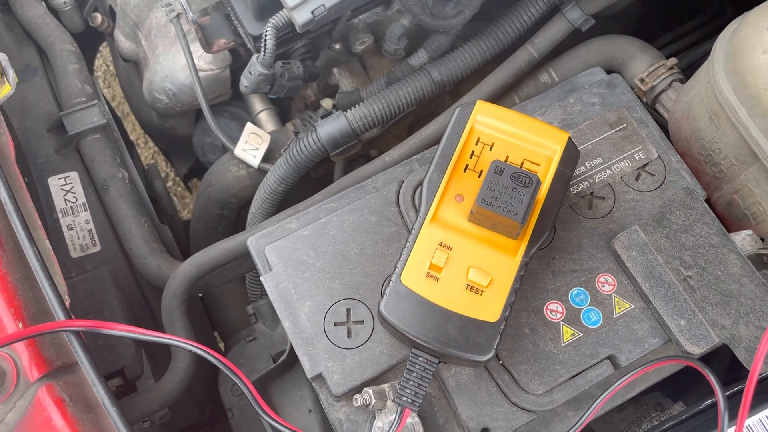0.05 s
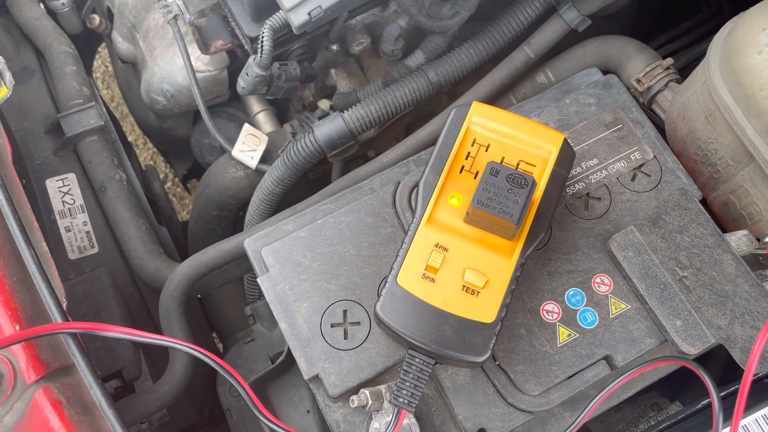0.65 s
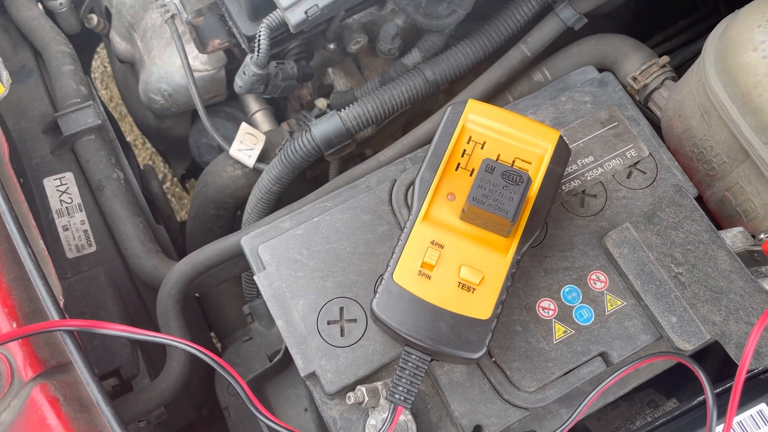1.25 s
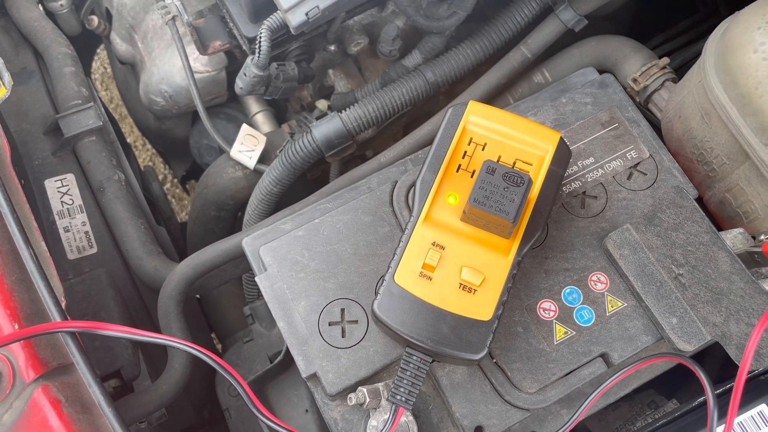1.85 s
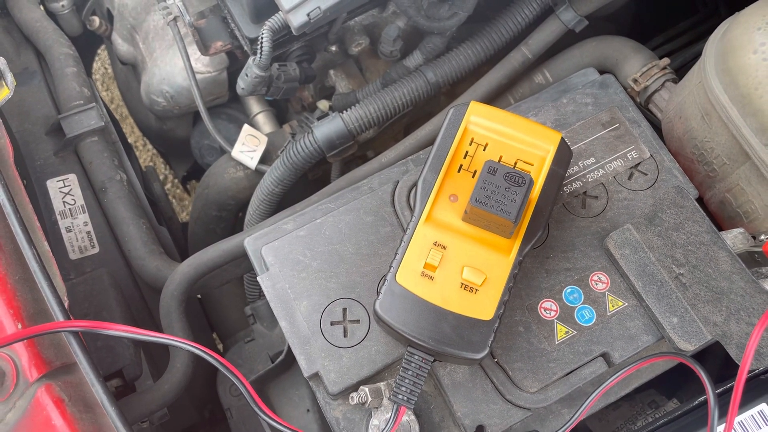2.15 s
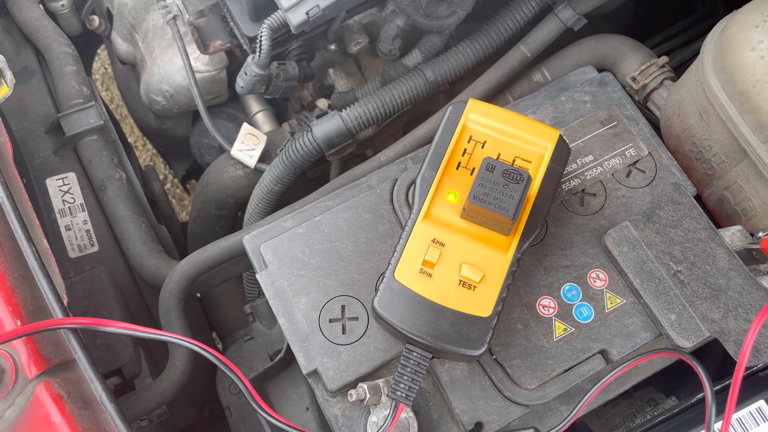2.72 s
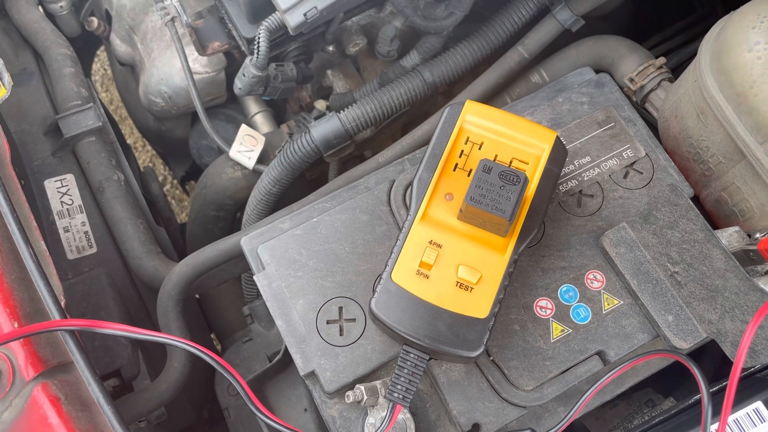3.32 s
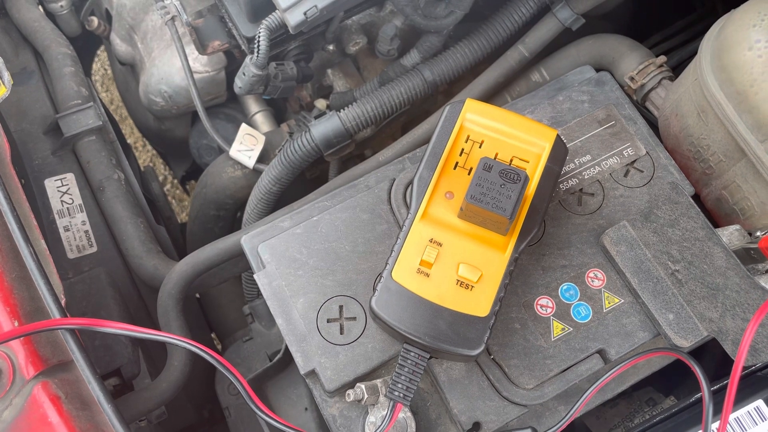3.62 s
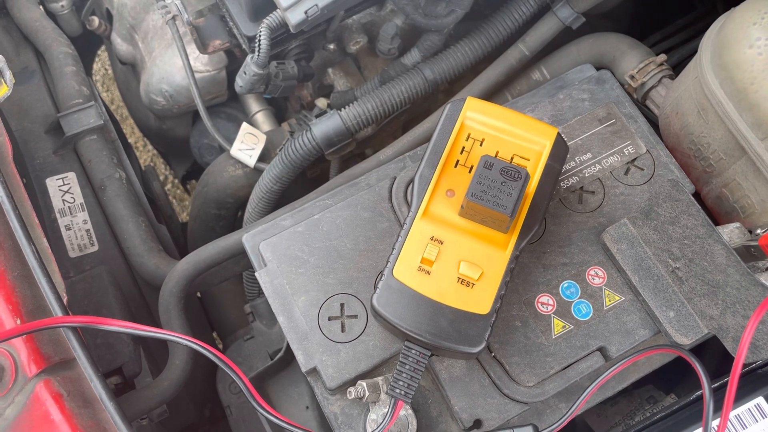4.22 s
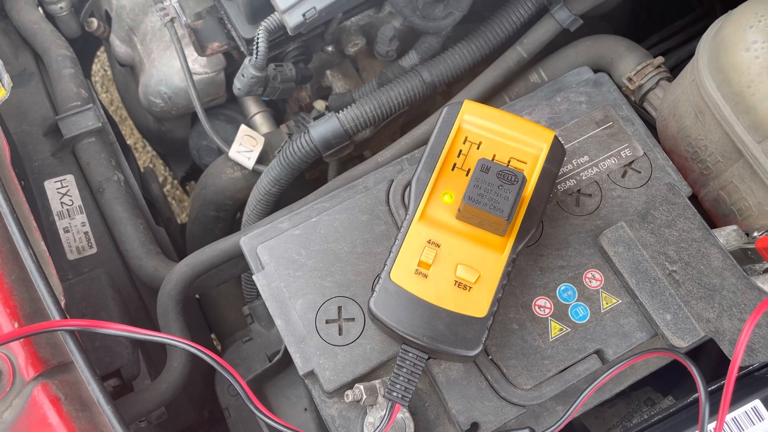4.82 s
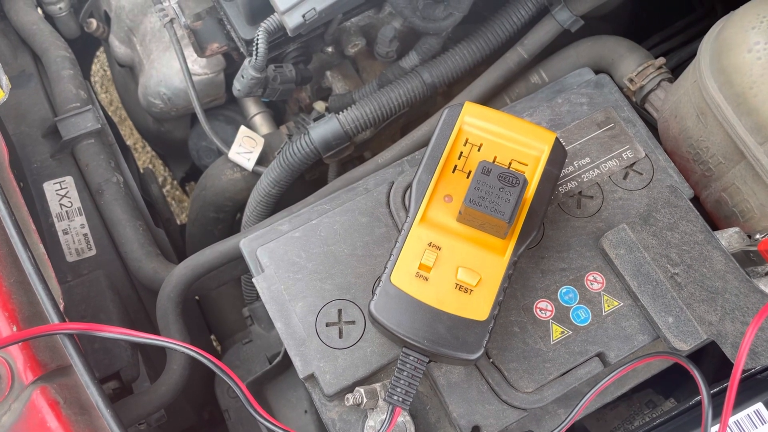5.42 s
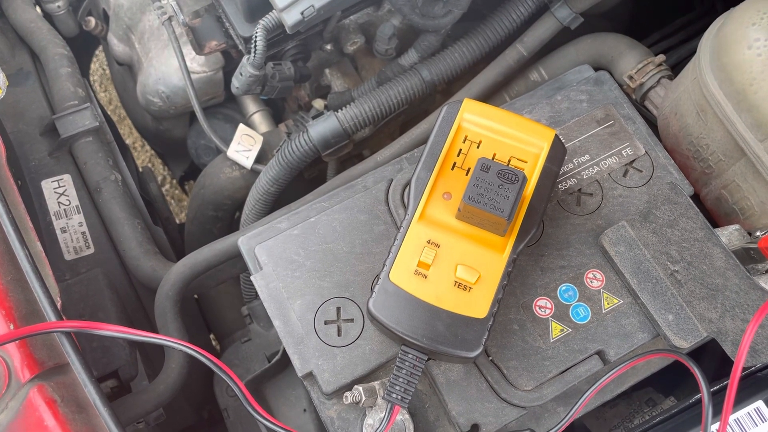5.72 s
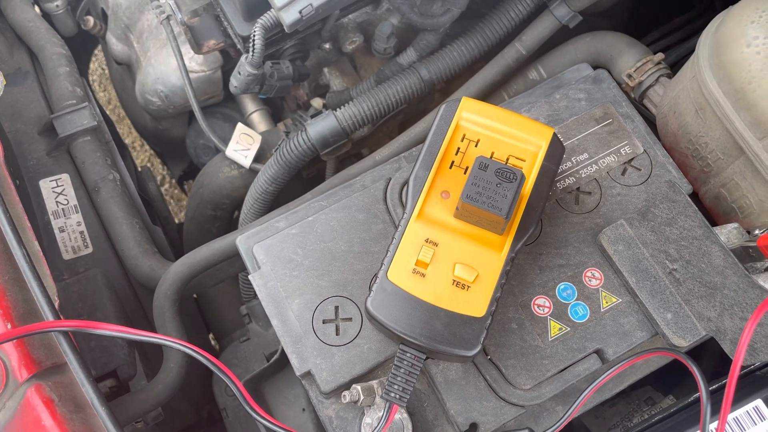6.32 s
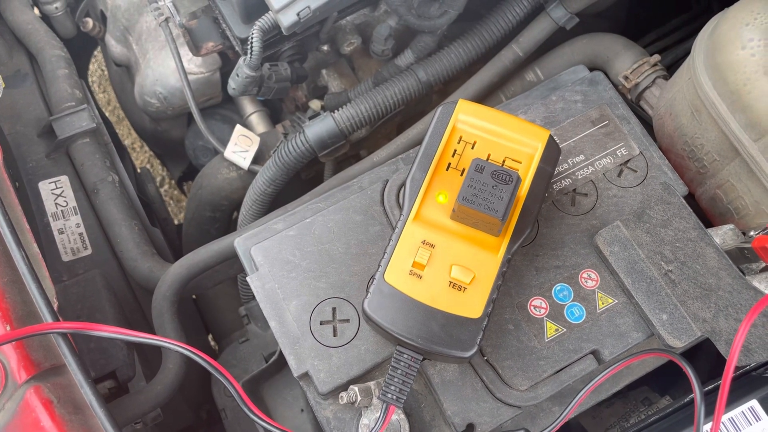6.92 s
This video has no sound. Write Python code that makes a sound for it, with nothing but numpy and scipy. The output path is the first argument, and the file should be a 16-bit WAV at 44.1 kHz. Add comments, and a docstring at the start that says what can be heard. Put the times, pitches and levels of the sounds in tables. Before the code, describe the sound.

A car relay clicks on and off evenly up close, over a low engine hum and the sound of an approaching car.

```python
"""A sharp, ringing tick close by, then a drier tock: a relay switches on and off about once a second.
It is driven by a tester lying on a car battery under an open bonnet. Each stroke of the armature
strikes and bounces, and these impacts excite the damped modes of the frame and plastic case.
Behind it an engine hums at its firing rate and road noise grows as the car draws nearer;
dull bumps and faint rustles come and go, and small birds call far off."""
import sys
import numpy as np
from scipy import signal
from scipy.fft import rfft, irfft
from scipy.io import wavfile
from scipy.ndimage import uniform_filter1d

SR = 44100
rng = np.random.default_rng(int(sys.argv[2]) if len(sys.argv) > 2 else 0)


def dump(signal):
    """Clip the signal to [-1, 1] and save it as 16-bit WAV at the path in sys.argv[1]."""
    limited = np.clip(np.atleast_2d(signal).T, -1, 1)
    pcm = np.round(limited * 32767).astype(np.int16)
    wavfile.write(sys.argv[1], SR, pcm)


N = 311346
RING = 16384  # samples allowed for one decay


def undb(db):
    """Amplitude ratio of a level in decibels."""
    return 10 ** (np.asarray(db) / 20)


def unit(x):
    """Normalisation to an rms of 1."""
    return x / np.sqrt(np.mean(x ** 2))


def decay(t60):
    """Exponential damping: a fall of 60 dB in t60 seconds."""
    return np.exp(-np.log(1000) * np.arange(RING) / SR / t60)


def curve(table):
    """Linear interpolation of (time [s], value) points at every sample."""
    return np.interp(np.arange(N) / SR, *np.transpose(table))


def colour(x, spectrum):
    """Spectral shaping by (frequency [Hz], gain [dB]) points, falling steeply above the last."""
    hz, db = np.transpose(spectrum)
    f = np.maximum(np.fft.rfftfreq(x.shape[-1], 1 / SR), 1)
    gain = undb(np.interp(np.log(f), np.log(hz), db))
    roll_off = np.minimum(hz[-1] / f, 1) ** 2
    return irfft(rfft(x) * gain * roll_off, x.shape[-1])


def lowpass(x, hz, order=2):
    """Maximally flat low-pass filtering."""
    return signal.sosfilt(signal.butter(order, hz, fs=SR, output="sos"), x)


def walk(rate_hz):
    """Slow random modulation: smoothed random steps with an rms of 1."""
    hold = int(SR / rate_hz)
    steps = np.repeat(rng.standard_normal(N // hold + 1), hold)
    return unit(uniform_filter1d(uniform_filter1d(steps, hold), hold)[:N])


# width of the outdoor sound: (frequency [Hz], side minus mid level [dB])
FIELD_WIDTH = [(60, -43), (150, -29.5), (300, -11), (600, -2), (1200, -7.5), (5000, -1)]

def diffuse(spectrum, size):
    """A diffuse field: noise from all around, coherent between the channels in the bass and increasingly so
    above 5 kHz."""
    mid, side = rng.standard_normal((2, size))
    side = colour(side, FIELD_WIDTH)
    return unit(colour(np.array([mid + side, mid - side]), spectrum))


def bird_note(length_s, start_hz, end_hz, waver=0.006, echo_db=-5, echo_decay_s=0.09):
    """Frequency modulation: an unsteady glide, blurred by echoes on its long path."""
    size = int(length_s * SR)
    jitter = unit(lowpass(rng.standard_normal(size), 200))
    hz = np.linspace(start_hz, end_hz, size) * (1 + waver * jitter)
    tone = np.sin(2 * np.pi * np.cumsum(hz) / SR) * np.sin(np.linspace(0, np.pi, size))
    echoes = rng.standard_normal((2, RING)) * np.exp(-np.arange(RING) / SR / echo_decay_s)
    paths = unit(echoes) * undb(echo_db) / np.sqrt(RING)
    paths[0, 0] += 1  # direct sound, left
    paths[1, 0] += 1  # and right
    return signal.fftconvolve(tone[None], paths)


# falling chirps: (time [s], start frequency [Hz], level [dB])
BIRD_CHIRPS = [(0.5, 7500, -69), (0.648, 7150, -60.5), (0.798, 6850, -59.5), (3.51, 7380, -66),
               (3.659, 7052, -60.5), (3.82, 6640, -72), (5.064, 7350, -69), (5.18, 7233, -72),
               (6.595, 6800, -63.5), (6.735, 6904, -57.5)]
# thin whistles: (time [s], duration [s], level [dB])
BIRD_WHISTLES = [(0.902, 0.21, -74), (2.449, 0.23, -75.5), (4.217, 0.17, -73.5), (5.715, 0.3, -75.5)]

def birds(chirp_s=0.11, fall_hz_per_s=9000):
    """Far birds call in linear frequency sweeps: steep chirps and nearly level two-tone whistles."""
    out = np.zeros((2, N))
    for s, start_hz, db in BIRD_CHIRPS:
        end_hz = start_hz - fall_hz_per_s * chirp_s
        add(out, s, undb(db) * bird_note(chirp_s, start_hz, end_hz, waver=0.01))
    for s, length_s, db in BIRD_WHISTLES:
        lower = bird_note(length_s, 7160, 7200)
        upper = undb(-4) * bird_note(length_s, 8330, 8480)
        add(out, s, undb(db) * (lower + upper))
    return out


def add(out, s, x):
    """Superposition of the sound x, starting at s seconds."""
    i = max(int(s * SR), 0)
    out[:, i:i + x.shape[-1]] += x[..., :max(N - i, 0)]


# faint rustles: (time [s], duration [s], level [dB], centre frequency [Hz])
TREBLE_RUSTLES = [(.12, .45, -67, 3520), (4.303, 0.28, -67, 3660), (4.877, 0.26, -82, 5600)]

def rustles():
    """Amplitude modulation of treble noise: soft rustles swell and fade unevenly."""
    out = np.zeros((2, N))
    for s, length_s, db, hz in TREBLE_RUSTLES:
        size = int(length_s * SR)
        band = diffuse([(hz / 2, -15), (hz, 0), (hz * 1.3, -6), (hz * 2, -45)], N)
        uneven = band * undb(db + 2.5 * walk(30))
        add(out, s, uneven[:, :size] * np.hanning(size))
    return out


# dull bumps: (time [s], level [dB], rise time [s], decay time [s], upper edge [Hz])
BASS_BUMPS = [(2.631, -29, 0.0083, 0.046, 264), (2.85, -30, 0.026, 0.12, 157),
              (4.98, -32.5, 0.073, 0.31, 255), (5.331, -32.5, 0.11, 0.081, 90)]

def bumps():
    """Transients of bass noise: each bump rises linearly and decays exponentially."""
    t, out = np.arange(RING) / SR, np.zeros((2, N))
    taper = 1 - (t / t[-1]) ** 2
    for s, db, rise_s, decay_s, edge_hz in BASS_BUMPS:
        noise = colour(rng.standard_normal(RING), [(25, -19), (55, 4.5), (120, -4.5), (250, -11)])
        body = unit(lowpass(noise, edge_hz, order=4))
        swell = np.minimum(t / rise_s, 1) * np.exp(-np.maximum(t - rise_s, 0) / decay_s)
        add(out, s, undb(db) * body * swell * taper)
    return out


def car_distance(speed_m_s=10.93, draws_level_s=7.42, sideways_m=2.8):
    """Uniform motion along a straight road: metres to the nearing car."""
    return np.hypot(speed_m_s * (draws_level_s - np.arange(N) / SR), sideways_m)


# spectra of the four parts of road noise: (frequency [Hz], relative level [dB])
ROAD_RUMBLE = [(25, -22), (42, 12), (70, 9.5), (130, 10), (180, 0.5), (260, -4), (380, -15.5), (700, -52)]
TYRE_ROAR = [(150, -3), (350, -2.5), (520, -1.5), (700, 3.5), (920, 2), (1150, -0.5), (1700, -5),
             (2400, -9.5), (4000, -24), (6500, -30.5), (8000, -71), (11500, -45.5)]
TREAD_DRONE = [(180, -1), (280, 2.5), (380, 3), (480, -1.5), (700, -14), (920, -2), (1200, -47)]
ROAD_HISS = [(300, -19), (900, -4.5), (2200, 5.5), (4000, -1), (6500, -7.5), (8000, -39), (9500, -13),
             (12500, -26.5), (14000, -48)]

def road(screening_db_per_m=0.3, waver_db=0.8):
    """Spherical spreading: the nearing car's noise swells and adds in power to steady far traffic."""
    metres = car_distance()
    near = undb(-screening_db_per_m * metres) / metres  # ground and obstacles add to the loss

    def level(far_db, car_db, path_gain):
        return np.hypot(undb(far_db), undb(car_db) * path_gain)

    rumble = diffuse(ROAD_RUMBLE, N) * level(-48, -17, near) * undb(1.24 * walk(7.7))
    tyres = diffuse(TYRE_ROAR, N) * level(-57.5, -23, near) * undb(waver_db * walk(14))
    drone = diffuse(TREAD_DRONE, N) * near * undb(-21 - 0.081 * metres + 2 * waver_db * walk(18))
    # the hiss falls off faster with distance, so it comes through last
    hiss = diffuse(ROAD_HISS, N) * level(-67, -25, near ** 2) * undb(waver_db * walk(7.3))
    return rumble + tyres + drone + hiss


# the engine pulls, changes up, pulls again, slows and rolls on: (time [s], firing rate [Hz])
FIRING_RATE = [(0.0, 72.75), (1.4, 78.74), (1.69, 73.2), (1.97, 52.53), (3.87, 67.78), (4.23, 65.27),
               (4.99, 45.44), (5.33, 46.8), (5.64, 42.26), (7.06, 46.35)]
# the engine's fundamental: (time [s], level [dB])
FUNDAMENTAL_LEVEL = [(0, -40.5), (1.0, -42), (1.9, -50.5), (3.1, -44.5), (4.6, -44), (5.0, -50), (6.5, -43),
                     (7.06, -34.5)]
# exhaust resonance that shapes the overtones: (frequency [Hz], gain [dB])
EXHAUST_RESONANCE = [(85, 0.5), (115, 5.5), (140, 0.5), (180, -10.5), (230, -11.5), (280, -15.5),
                     (380, -19.5), (450, -18)]

def engine(overtone_base_db=-24.5, pull_db_per_octave=2):
    """Periodic firing gives a harmonic series, whose overtones grow with engine speed and nearness."""
    hz = curve(FIRING_RATE)
    pull_db = pull_db_per_octave * np.log2(hz / hz.min())
    overtone_db = overtone_base_db + pull_db - 20 * np.log10(car_distance())
    phase = 2 * np.pi * np.cumsum(hz * (1 + 0.0072 * walk(12))) / SR
    hum = undb(curve(FUNDAMENTAL_LEVEL) + 1.8 * walk(8.2)) * np.sin(phase)
    for k in range(2, 9):
        exhaust_db = np.interp(k * hz, *np.transpose(EXHAUST_RESONANCE))
        hum += undb(overtone_db + exhaust_db + 3.3 * walk(14)) * np.sin(k * phase)
    return np.sqrt(2) * hum


def contact(s, low_hz, high_hz):
    """Force spectrum of an impact at s seconds: a softer contact excites a narrower band."""
    f = np.fft.rfftfreq(RING, 1 / SR)
    band = signal.butter(2, [low_hz, high_hz], "band", fs=SR, output="sos")
    return signal.sosfreqz(band, f, fs=SR)[1] * np.exp(-2j * np.pi * f * s)


def frame_ring(modes, build_cycles=1.8):
    """Modal superposition: each damped mode builds up as the blow spreads through the frame."""
    t, ring = np.arange(RING) / SR, np.zeros(RING)
    for k, (hz, db, t60) in enumerate(modes):
        build_up = 1 - np.exp(-(t * hz / build_cycles) ** 2)
        ring += (-1) ** k * undb(db) * np.sin(2 * np.pi * hz * t) * decay(t60) * build_up
    return ring


def case_rattle(grain, spectrum, low_t60=0.027, treble_t60=0.023):
    """Modal overlap: the case's dense modes merge into noise that varies a little with each stroke."""
    noise = unit(colour(grain + 0.5 * rng.standard_normal(RING), spectrum))
    low = signal.sosfiltfilt(signal.butter(2, 7000, fs=SR, output="sos"), noise)
    return low * decay(low_t60) + (noise - low) * decay(treble_t60)


# lead of the left microphone port over the right: (frequency [Hz], phase [rad])
PORT_PHASE = [(1200, 0), (2600, .5), (4200, .8), (5000, .1), (6000, 1.4), (7000, 2.5), (7700, 3.14),
              (10000, 5.6), (11500, 6.5), (13600, 9.3), (15500, 10.3)]

def ports(spectrum):
    """Path difference: the tester's sound reaches the left port first; returns a stereo waveform."""
    lead = np.interp(np.fft.rfftfreq(RING, 1 / SR), *np.transpose(PORT_PHASE))
    return irfft(spectrum * np.exp(0.5j * np.array([lead, -lead])))


# reflections from the engine bay: (frequency [Hz], relative level [dB])
BAY_REFLECTIONS = [(250, -5), (600, 0), (1700, -10.5), (2400, 7), (3700, 1.5), (6500, -13.5), (8000, -26),
                   (11500, -13), (14000, -48)]

def strokes(first_s, blows, modes, case_spectrum, case_db, bay_db, bay_t60, cycle_s=1.05467):
    """Convolution: each cycle the same blows drive the responses of frame, case and engine bay."""
    out = np.zeros((2, N))
    early_s = 0.006  # room for the touches before the main blow
    force = sum(undb(db) * contact(early_s + s, low_hz, high_hz) for s, db, low_hz, high_hz in blows)
    ring = frame_ring(modes)
    grain = rng.standard_normal(RING)  # the part of the rattle common to all strokes
    bay = diffuse(BAY_REFLECTIONS, RING) * undb(bay_db) * decay(bay_t60)
    reflected = irfft(rfft(bay) * force)
    for s in np.arange(first_s, N / SR, cycle_s):
        case = undb(case_db) * case_rattle(grain, case_spectrum)
        direct = ports(rfft(ring + case) * force)
        add(out, s - early_s, direct + reflected)
    return out


# the armature touches, lands and bounces:
# (time from the main blow [s], strength [dB], lower band edge [Hz], upper band edge [Hz])
PULL_IN_CONTACTS = [(-0.00196, -4.4, 1630.0, 4400.0), (0.00011, 4.3, 100.0, 15200.0),
                    (0.00338, -7.1, 410.0, 2900.0), (0.01172, -17.9, 1460.0, 3100.0)]
RELEASE_CONTACTS = [(-0.00337, -14.8, 2630.0, 4700.0), (-0.00032, 0.2, 100.0, 14300.0),
                    (0.00234, -8.7, 500.0, 4500.0)]
# frame modes, armature closed on the core or open against its stop:
# (frequency [Hz], relative level [dB], time to fall 60 dB [s])
FRAME_CLOSED = [(450, -42.4, 0.049), (555, -44.9, 0.031), (669, -42.5, 0.028), (881, -47.1, 0.039),
                (1326, -52.6, 0.057), (2081, -41.5, 0.06), (2251, -26.3, 0.018), (2323, -34.0, 0.041),
                (2439, -38.4, 0.11), (2539, -30.9, 0.034), (2734, -42.1, 0.025), (3386, -35.4, 0.017),
                (3753, -38.4, 0.035), (4314, -33.5, 0.029), (4524, -33.6, 0.015), (4636, -43.0, 0.06),
                (4930, -28.2, 0.013), (5062, -43.7, 0.075), (5196, -38.1, 0.029), (5705, -34.7, 0.025),
                (6279, -37.7, 0.021), (6389, -49.6, 0.087), (6492, -38.9, 0.034), (6733, -33.0, 0.014),
                (7252, -41.6, 0.046), (7654, -37.1, 0.036), (8307, -31.3, 0.015), (10154, -46.4, 0.029),
                (11037, -43.1, 0.023), (15320, -38.9, 0.017)]
FRAME_OPEN = [(566, -38.3, 0.04), (716, -37.2, 0.03), (827, -43.3, 0.031), (1345, -44.9, 0.061),
              (2188, -32.9, 0.048), (2334, -35.1, 0.078), (2488, -35.6, 0.036), (2687, -43.0, 0.043),
              (3078, -34.7, 0.031), (3299, -40.4, 0.043), (3440, -24.5, 0.034), (3553, -47.3, 0.099),
              (3681, -33.5, 0.048), (3952, -17.8, 0.014), (3947, -29.0, 0.027), (4091, -32.7, 0.033),
              (4332, -26.9, 0.026), (4556, -31.8, 0.028), (5076, -49.7, 0.048), (5662, -42.9, 0.024),
              (6040, -32.1, 0.05), (6498, -44.8, 0.048), (6919, -27.1, 0.017), (7225, -29.7, 0.024),
              (7628, -42.6, 0.022), (8396, -36.7, 0.02), (10215, -44.9, 0.023), (11359, -48.6, 0.034),
              (15663, -42.3, 0.022)]
# spectrum of the plastic case: (frequency [Hz], relative level closed [dB], relative level open [dB])
CASE_SPECTRA = [(250, -33, -31), (500, -20, -9), (800, -20, -18), (1300, -40, -37), (1900, -32, -48),
                (2270, -1, 5), (2620, -1, -17), (3080, 4, -5), (4270, 0, -0.5), (5700, -3, -1),
                (8100, -3.5, -1.5), (9500, -6.5, -4.5), (12000, -8.5, -5), (14000, -10, -5),
                (15500, -15, -18)]

def relay(pull_in_s=0.0072, release_s=0.53):
    """Impact excitation: the coil pulls the armature in (a tick), the spring returns it (a tock)."""
    case_closed = [(hz, db) for hz, db, _ in CASE_SPECTRA]
    case_open = [(hz, db) for hz, _, db in CASE_SPECTRA]
    ticks = strokes(pull_in_s, PULL_IN_CONTACTS, FRAME_CLOSED, case_closed,
                    case_db=-32, bay_db=-43.5, bay_t60=0.11)
    tocks = strokes(release_s, RELEASE_CONTACTS, FRAME_OPEN, case_open,
                    case_db=-28.5, bay_db=-41.5, bay_t60=0.13)
    return ticks + tocks


def scene():
    """Superposition of the relay in front and the street behind."""
    return relay() + engine() + road() + bumps() + rustles() + birds()


def record(dry, bottom_hz=29, top_hz=16200):
    """Band limiting: the phone cuts the deepest bass and the highest treble."""
    bass_cut = signal.sosfilt(signal.butter(4, bottom_hz, "high", fs=SR, output="sos"), dry)
    return signal.sosfilt(signal.ellip(8, 0.2, 70, top_hz, fs=SR, output="sos"), bass_cut)


dry = scene()
out = record(dry)
dump(out)
```